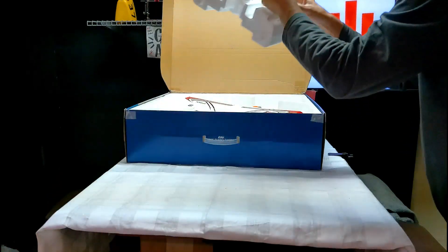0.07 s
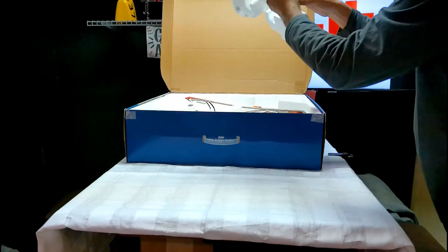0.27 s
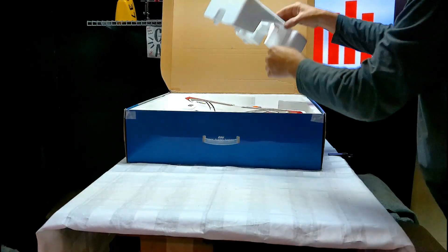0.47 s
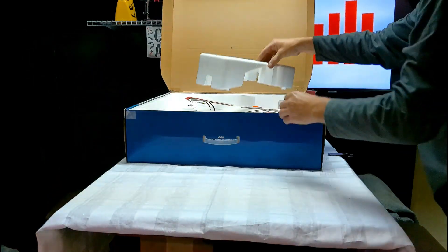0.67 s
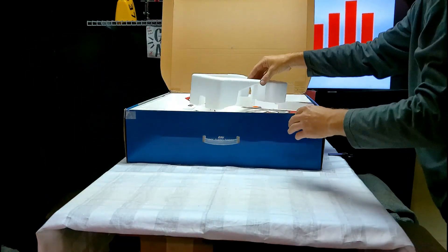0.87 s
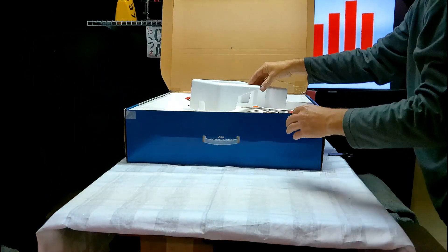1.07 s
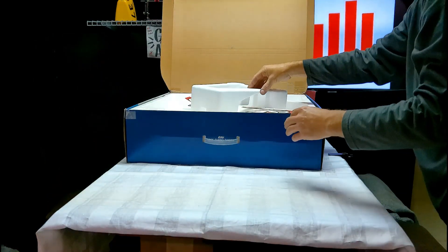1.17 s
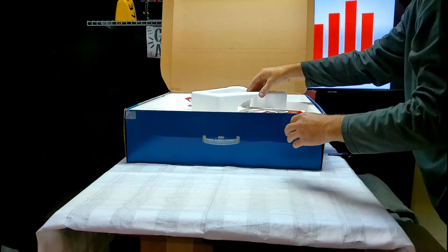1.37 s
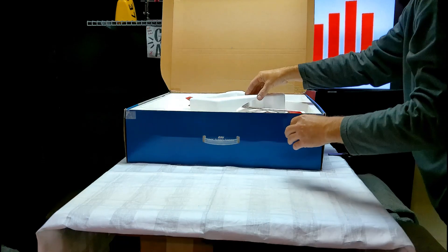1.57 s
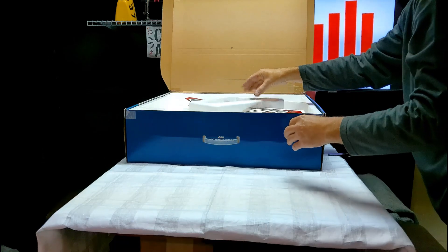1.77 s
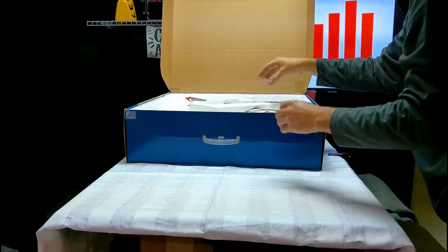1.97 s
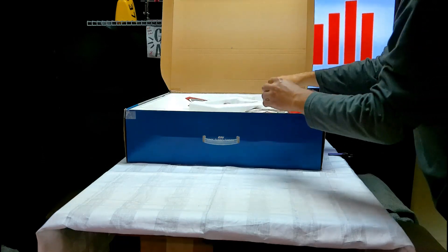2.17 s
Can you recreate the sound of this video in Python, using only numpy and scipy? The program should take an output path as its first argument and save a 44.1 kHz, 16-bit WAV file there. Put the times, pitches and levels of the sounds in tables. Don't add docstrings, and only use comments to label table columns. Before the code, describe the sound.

Foam insert rubs and scrapes into a cardboard box, then lands with a loud hollow knock

```python
import sys
import numpy as np
from scipy import signal
from scipy.fft import rfft, irfft, next_fast_len
from scipy.io import wavfile
from scipy.ndimage import uniform_filter1d, map_coordinates

SR = 44100
rng = np.random.default_rng(int(sys.argv[2]) if len(sys.argv) > 2 else 0)


def natural_amplitude(level_db):
    exponent = np.asarray(level_db, float) / 20
    return 10 ** exponent


def store_wav(level_fs):
    pcm = np.round(np.clip(np.atleast_2d(level_fs), -1, 1) * 32767)
    wavfile.write(sys.argv[1], SR, pcm.T.astype(np.int16))


N = 97593


def unit(x):
    return x / np.sqrt(np.mean(x ** 2) + 1e-20)


def along(points, hz):
    f, v = np.transpose(points)
    return np.interp(np.log(hz + 1), np.log(f + 1), v)


def wobble(rate):
    knots = rng.standard_normal(int(N * rate / SR) + 4)
    return map_coordinates(knots, [np.arange(N) * rate / SR])


def filtered(x, response):
    m = next_fast_len(N + SR // 2)
    return irfft(rfft(x, m) * response(np.fft.rfftfreq(m, 1 / SR)), m)[:N]


def coloured(x, spectrum):
    return unit(filtered(x, lambda hz: natural_amplitude(along(spectrum, hz))))


def patches(x, depth_db):
    z = signal.stft(x, nperseg=256)[2]
    field = uniform_filter1d(rng.standard_normal(z.shape), size=4, axis=0)
    field = uniform_filter1d(field, size=5, axis=1)
    return signal.istft(z * natural_amplitude(depth_db * unit(field)), nperseg=256)[1][:N]


def resonances(peaks):
    return lambda f: 1 + sum((natural_amplitude(db) - 1) / (1 + 2j * (f - c) / w) for c, w, db in peaks)


# pitch_hz, density_db_per_hz
RUMBLE = [(12, -68.5), (20, -11), (32, -18), (65, -19), (335, -31), (375, -33), (900, -46.5), (1170, -46.5),
          (1980, -120)]
# pitch_hz, density_db_per_hz
HISS = [(410, -40), (700, -4.5), (2170, -11), (3830, -14), (9030, -17), (13500, -16), (15600, -16.5)]
RUMBLE_DB, HISS_DB = -53.5, -67
LUMPS_DB = 1.2
RUMBLE_TOP = 2.4
FRAME_HZ, FRAME_S = 29.97, .0005
TICK_DB, TICK_SPREAD_DB, TICK_MS = -47, 3, 1.0


def recorder_floor():
    rumble = patches(coloured(rng.standard_normal(N), RUMBLE), depth_db=2.5)
    rumble = unit(rumble * natural_amplitude(LUMPS_DB * wobble(44.25)))
    rumble = RUMBLE_TOP * np.tanh(rumble / RUMBLE_TOP)
    hiss = unit(patches(coloured(rng.standard_normal(N), HISS), depth_db=1.5))
    tick_s = FRAME_S + np.arange(int(N / SR * FRAME_HZ)) / FRAME_HZ
    at = np.round(tick_s * SR).astype(int)
    ticks = np.zeros(N)
    ticks[at] = natural_amplitude(TICK_DB + TICK_SPREAD_DB * np.clip(rng.standard_normal(len(at)), -2, 1))
    u = np.arange(-400, 401) / SR * 1000 / TICK_MS
    shape = np.exp(-u ** 2) - 0.28 * np.exp(-(u / 4) ** 2)
    return natural_amplitude(RUMBLE_DB) * rumble + natural_amplitude(HISS_DB) * hiss + signal.fftconvolve(ticks, shape, "same")


# pitch_hz, t60_s
ROOM = [(200, 0.34), (700, 0.26), (2000, 0.2), (10000, 0.061)]


def room(x):
    hz, t, z = signal.stft(rng.standard_normal(SR // 2), SR, nperseg=256)
    decay = natural_amplitude(-60 * t / along(ROOM, hz)[:, None])
    tail = signal.istft(z * decay, SR, nperseg=256)[1]
    late = np.pad(x, (300, 0))
    return signal.fftconvolve(late, tail / np.linalg.norm(tail))[:N]


# centre_s, pitch_hz, level_db,
# half_length_ms
SQUEALS = [(.02, 4260, -37.5, 1.2), (0.0346, 2200, -44, 1), (0.047, 2790, -44.5, 1.5),
           (.41, 584, -60.5, 22), (.16, 870, -55, 9.7), (.2, 870, -55, 17), (.235, 870, -56, 8),
           (.265, 2270, -53, 6), (0.283, 650, -49.5, 8), (0.355, 7240, -35, 2), (.37, 7280, -39, 3),
           (1.49, 2050, -60, 6), (1.632, 2005, -53, 16), (1.761, 2736, -54, 4), (1.778, 3250, -50.5, 4),
           (1.789, 3600, -48.5, 3), (1.797, 3200, -48.5, 4), (1.8, 4800, -44, 5), (1.811, 2760, -49, 3)]


def squeals():
    t = np.arange(N) / SR
    out = np.zeros(N)
    for s, hz, db, half_ms in SQUEALS:
        swell = np.exp(-((t - s) * 1000 / half_ms) ** 2)
        out += natural_amplitude(db) * swell * np.sin(2 * np.pi * hz * t + 1.3 * wobble(300))
    return out


# start_s, rise_s, peak_db, fall_db_per_s, thrum_over_hiss_db
SCUFFS = [(-.02, 0.026, -61, 123, 16.5), (0.015, 0.0037, -51, 500, 10.5), (0.028, 0.0086, -49, 340, 7.5),
          (.08, 0.049, -62, 33.5, 4.5), (0.138, 0.0075, -48, 299, -3), (.175, 0.078, -68, 148, 18),
          (0.2249, 0.007, -44, 208, -17), (0.26, 0.0029, -66, 260.5, 12.5), (0.329, 0.0074, -59, 200, 1),
          (.346, .007, -40.5, 110, -16), (.358, .011, -41, 400, -17), (.39, 0.022, -59, 225, -6),
          (1.238, 0.008, -61.5, 37, -14), (1.259, 0.031, -54, 133, 1.5), (1.334, 0.036, -52.5, 102, -5),
          (1.42, 0.013, -62, 82, 0), (1.446, 0.05, -51.5, 13, -1.5), (1.528, 0.023, -46.5, 395, -14),
          (1.592, 0.015, -53, 82, 2), (1.65, 0.023, -86, 203, -8), (1.726, 0.053, -45.5, 112, 1.5),
          (1.779, 0.02, -42.5, 271.5, -15)]
LIFT_OFFS = [
    .388,
    1.392,
    1.568,
]
LIFT_DB_PER_S = 701
# pitch_hz, density_db_per_hz
BEADS = [(900, -13), (2300, -11), (3800, -14), (5000, -10.5), (7400, -4), (10500, -1.5), (13000, -6.5),
         (15700, -14.5)]
# pitch_hz, width_hz, level_db
FOAM = [(3200, 500, 5.5), (4800, 400, 5.5), (7490, 600, 3.5), (9000, 940, 2.5), (11500, 800, 0.5)]
# pitch_hz, density_db_per_hz
HELD = [(88, -38), (150, -0.5), (506, -15), (777, -7.5), (922, -14), (1410, -11.5), (2100, -17.5),
        (4300, -14), (9000, -26), (11700, -57), (19800, -120)]
# pitch_hz, width_hz, level_db
HELD_RINGS = [(430, 60, 6), (580, 45, 8), (860, 60, 9), (1230, 80, 4), (2020, 90, 7)]
# pitch_hz, density_db_per_hz
THRUM = [(120, -9), (200, -9.5), (633, -8.5), (904, -15.5), (1690, -19), (2700, -14.5), (3970, -16),
         (4710, -16), (6000, -16.5), (7800, -39), (13200, -120)]
BEADS_PER_S, BEAD_SPREAD_DB = 6000, 2.5
SMOOTH_SHARE = 0.47
IN_BOX_S = .9


def scuffs():
    t = np.arange(N) / SR
    hiss_power, thrum_power = np.zeros(N), np.zeros(N)
    for s, rise, db, fall, thrum_db in SCUFFS:
        stroke = np.clip((t - s) / rise, 0, 1) ** 2
        stroke = stroke * natural_amplitude(db - fall * np.clip(t - s - rise, 0, 1))
        lift_s = min([a for a in LIFT_OFFS if a > s], default=N)
        stroke = stroke * natural_amplitude(-LIFT_DB_PER_S * np.clip(t - lift_s, 0, 1))
        hiss_power += stroke ** 2
        thrum_power += (stroke * natural_amplitude(thrum_db)) ** 2

    snaps = (rng.random(N) < BEADS_PER_S / SR) * rng.choice([-1, 1], N)
    snaps = snaps * natural_amplitude(BEAD_SPREAD_DB * np.minimum(rng.exponential(1, N), 3))
    grit = SMOOTH_SHARE * rng.standard_normal(N) + (1 - SMOOTH_SHARE) * unit(snaps)

    beads = filtered(coloured(grit, BEADS), resonances(FOAM))
    beads = unit(patches(beads, depth_db=0.5)) * natural_amplitude(1.7 * wobble(170))

    other_grit = grit[::-1]
    held = unit(filtered(coloured(other_grit, HELD), resonances(HELD_RINGS)))
    body = np.where(t < IN_BOX_S, held, coloured(other_grit, THRUM))
    body = unit(patches(body, depth_db=1.5)) * natural_amplitude(1.5 * wobble(90))
    return np.sqrt(hiss_power) * beads + np.sqrt(thrum_power) * body


# start_s, level_db, swell_ms, thud_hz
KNOCKS = [(.0195, -32.5, 0.54, 493), (.0358, -34, 0.25, 1500), (.045, -38.5, 2.2, 760),
          (.2645, -36.5, 0.38, 1920), (1.352, -40.5, 1.5, 510), (1.6, -40, 1.2, 610),
          (1.783, -42, 1.8, 555), (1.7925, -30, 2, 420), (1.799, -40.5, 3.4, 634), (1.811, -46, 4.7, 615),
          (1.826, -32, 3.1, 397), (1.364, -46, 7.5, 565), (1.612, -41, 3.7, 510), (1.8552, -24, 4.7, 536),
          (1.8660, -1.5, 3.66, 532), (1.8750, -6, 2.5, 523), (1.8838, -11, 1.53, 686),
          (1.8885, -16.5, 1.1, 907), (1.8990, -9.5, 2.5, 350), (1.9090, -21.5, 9.4, 456),
          (1.9160, -21.5, 0.88, 590), (1.9237, -23, 1.9, 680), (.955, -56, 7.5, 617),
          (1.015, -56.5, 3.7, 600), (1.19, -54, 7, 660), (1.29, -56, 2.3, 500), (1.062, -57.5, 8.8, 566)]
# pitch_hz, level_db, t60_s
INSERT = [(178, 0, 0.05), (580, -17, 0.4), (760, -9, 0.07), (870, -20, .15), (1305, -20, 0.033),
          (2050, -8, .04), (2820, -8, 0.015), (4260, -4, 0.0088)]
# pitch_hz, level_db, t60_s
BOX = [(205, -21, 0.05), (255, -18, 0.05), (352, -14, 0.12), (438, -12.5, 0.12), (551, -13, 0.09),
       (588, -16, 0.12), (641, -17, 0.08), (714, -16, 0.22), (788, -15.5, 0.1), (985, -19, 0.08),
       (1200, -25, 0.15), (1355, -26, .09), (1543, -26, .08), (2089, -28, 0.09)]
# pitch_hz, density_db_per_hz
SLAP = [(530, -24), (900, -3.5), (1350, -12), (2120, -14.5), (2790, -22), (10600, -36.5), (15600, -43)]
SLAP_DB, SLAP_T60_S = -19.5, 0.13
MODE_SPREAD_DB, WAVER = 2, 1.1
BASS_CUT_HZ, RISE_MS = 220, 0.9


def knocks():
    out, slap_power = np.zeros(N + SR), np.zeros(N + SR)
    t = np.arange(SR // 2) / SR
    chance = rng.standard_normal((len(KNOCKS), len(BOX)))
    drifts = [wobble(52.2)[:len(t)] for _ in BOX]
    waver = [w - w[0] for w in drifts]
    rise = 1 - np.exp(-t * 1000 / RISE_MS)
    for (s, db, swell_ms, thud_hz), row in zip(KNOCKS, chance):
        u = t * 1000 / swell_ms
        thud = u ** 2 * np.exp(1 - u ** 2) * np.sin(2 * np.pi * thud_hz * t)
        ring = np.zeros(len(t))
        for (hz, level, t60), c, w in zip(BOX if s > IN_BOX_S else INSERT, row, waver):
            decay = natural_amplitude(level + MODE_SPREAD_DB * c - 60 * t / t60)
            ring += decay * np.sin(2 * np.pi * hz * t + WAVER * w)
        start = round(s * SR)
        out[start:][:len(t)] += natural_amplitude(db) * (thud + rise * ring)
        slap_power[start:][:len(t)] += rise * natural_amplitude(2 * (db + SLAP_DB - 60 * t / SLAP_T60_S))
    body = filtered(out[:N], lambda f: (1j * f / (BASS_CUT_HZ + 1j * f)) ** 3)
    return body + np.sqrt(slap_power[:N]) * coloured(rng.standard_normal(N), SLAP)


ROOM_DB, SCUFF_ROOM_DB = -18.5, -11


def scene():
    knock = knocks()
    scuff = scuffs() + squeals()
    reflections = room(natural_amplitude(ROOM_DB) * knock + natural_amplitude(SCUFF_ROOM_DB) * scuff)
    return (knock + scuff + reflections + recorder_floor())[None]


# centre_s, lost_above_hz, half_length_s
HOLES = [
    (.11, 1300, .009),
    (.205, 2200, .016),
    (.221, 6500, .007),
    (.411, 1800, .005),
    (.537, 1000, .008),
    (.794, 900, .008),
    (1.2, 900, .009),
    (1.413, 800, .0045),
    (1.585, 700, .0045),
    (2.073, 2000, .011),
]
HOLE_DB, SHALLOW_S, SHALLOW_SHARE = -16, .012, .3
TOP_HZ = 15650


def treble_dropouts(x):
    hz, at, z = signal.stft(x, SR, nperseg=256, noverlap=192)
    hz = hz[:, None]
    loss_db = 0
    for s, edge_hz, half in HOLES:
        depth_db = HOLE_DB * (1 if half < SHALLOW_S else SHALLOW_SHARE)
        moment = np.exp(-((at - s) / half) ** 4)
        loss_db = loss_db + depth_db * moment / (1 + (edge_hz / (hz + 1)) ** 6)
    return signal.istft(z * natural_amplitude(loss_db) * (hz < TOP_HZ), SR, nperseg=256, noverlap=192)[1][:N]


# centre_s, pitch_hz, level_db
BIRDIES = [(.111, 6450, -71), (.111, 2090, -67), (0.111, 854, -49), (.794, 323, -55.5), (.794, 720, -67),
           (0.408, 1460, -57), (.412, 4800, -60), (.415, 9300, -58.5), (.415, 10300, -60),
           (.415, 11800, -63), (2.074, 1755, -68), (.537, 1620, -68.5), (.794, 2250, -69.5),
           (1.2, 4120, -73), (1.2, 2150, -73), (1.413, 4200, -69), (1.413, 5650, -64), (1.413, 11500, -69),
           (1.585, 5740, -60), (1.585, 7200, -59), (1.585, 9100, -54), (1.585, 10100, -56.5)]
BIRDIE_S = 0.013


def lone_tones():
    t = np.arange(N) / SR
    out = np.zeros(N)
    for s, hz, db in BIRDIES:
        swell = np.exp(-((t - s) / BIRDIE_S) ** 2)
        out += natural_amplitude(db) * swell * np.sin(2 * np.pi * hz * t + 0.57 * wobble(140))
    return out


def roll_off(x):
    return signal.sosfilt(signal.butter(12, 15720, fs=SR, output="sos"), x)


OFFSET = .029


def record(dry):
    mix = treble_dropouts(dry[0]) + lone_tones() + OFFSET
    return roll_off(mix[None])


dry = scene()
out = record(dry)
store_wav(out)
```